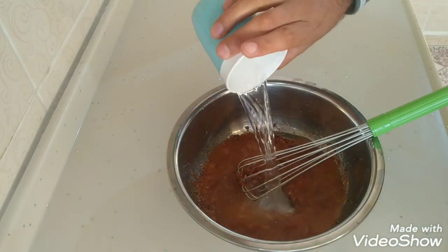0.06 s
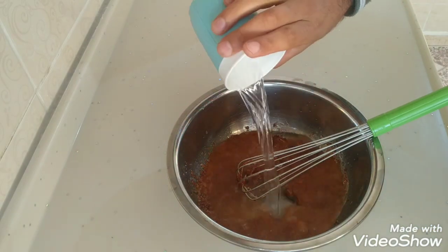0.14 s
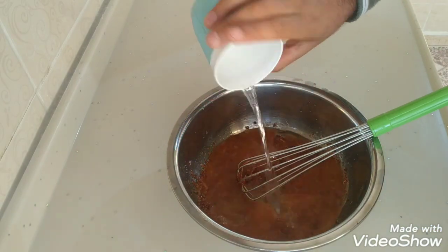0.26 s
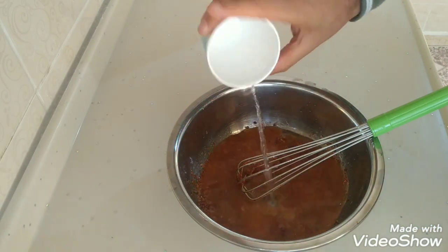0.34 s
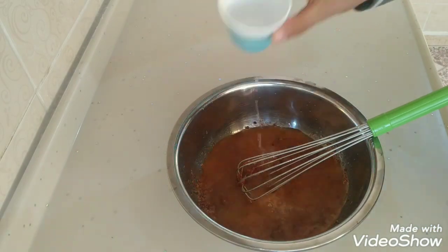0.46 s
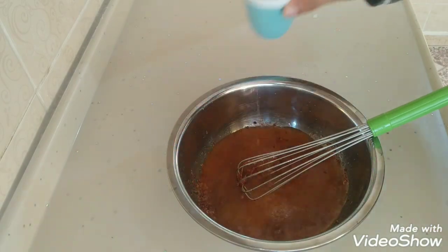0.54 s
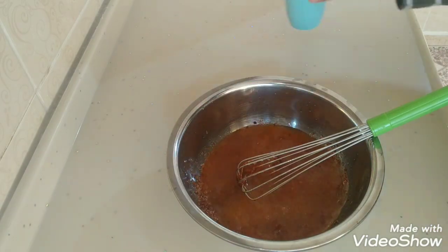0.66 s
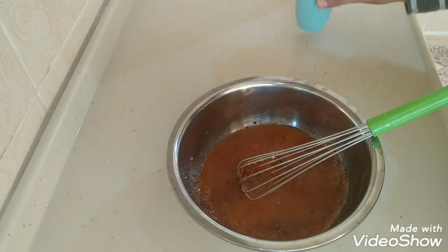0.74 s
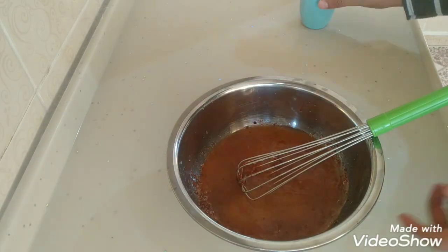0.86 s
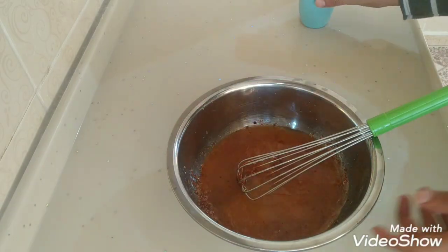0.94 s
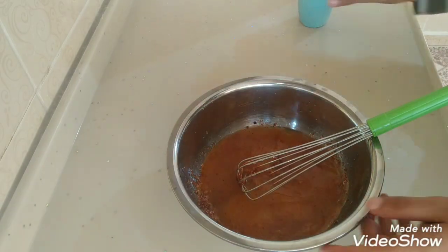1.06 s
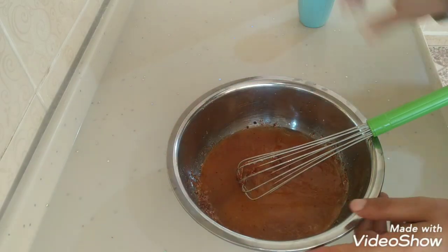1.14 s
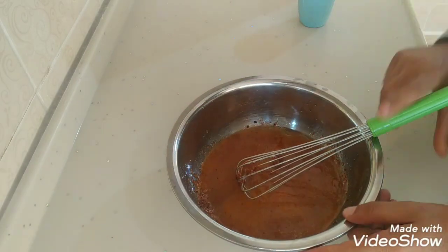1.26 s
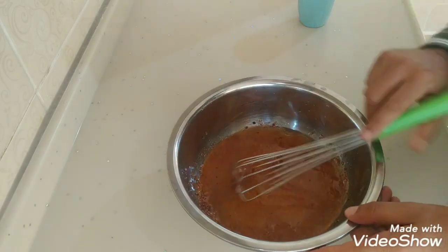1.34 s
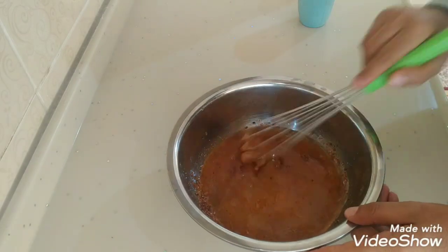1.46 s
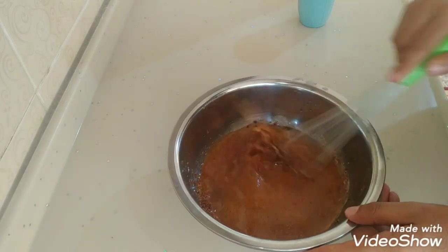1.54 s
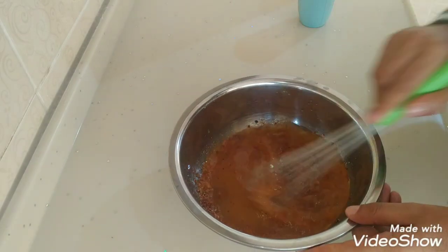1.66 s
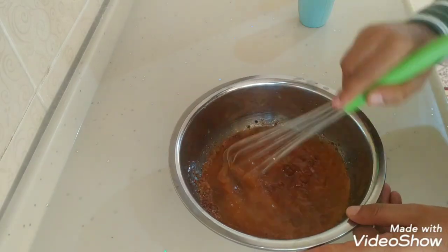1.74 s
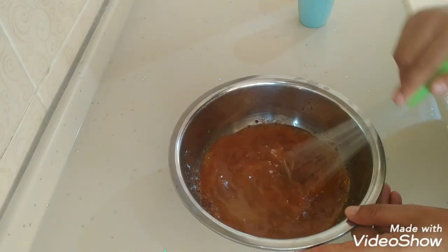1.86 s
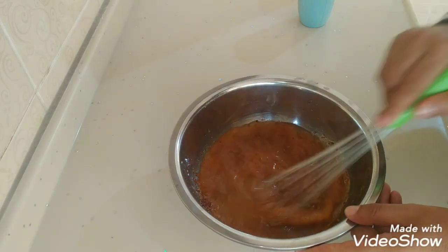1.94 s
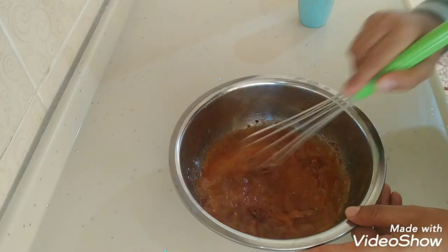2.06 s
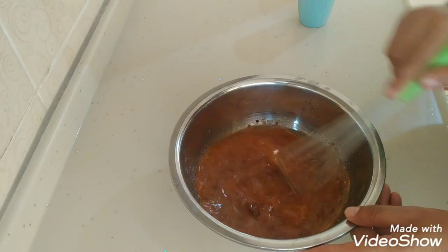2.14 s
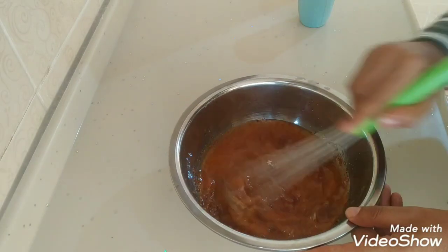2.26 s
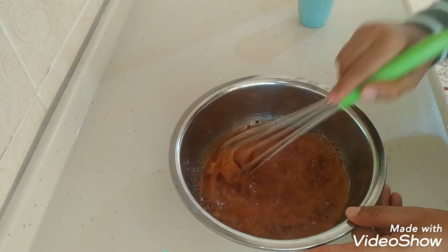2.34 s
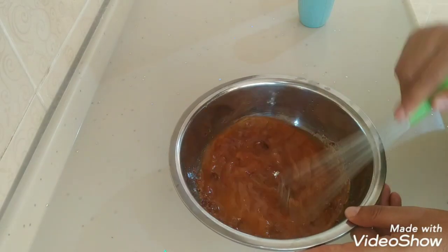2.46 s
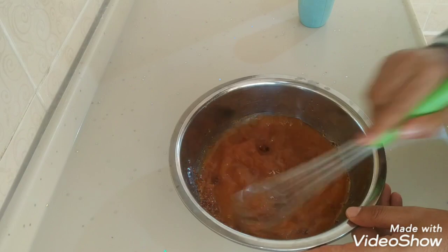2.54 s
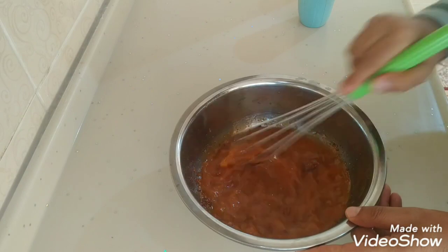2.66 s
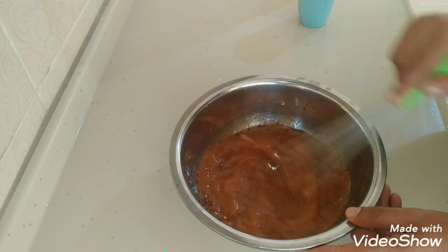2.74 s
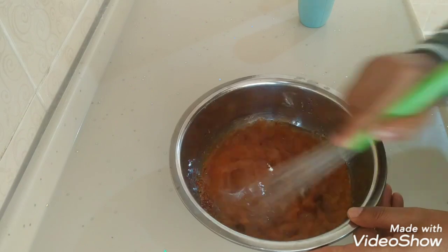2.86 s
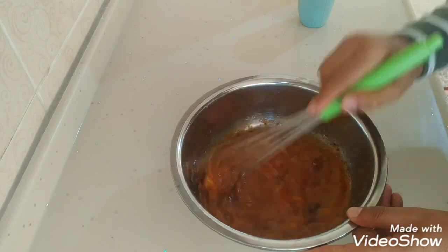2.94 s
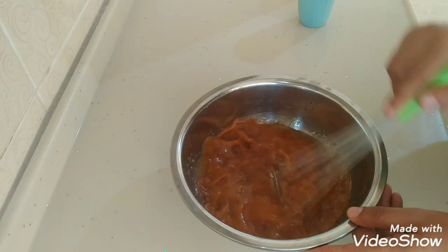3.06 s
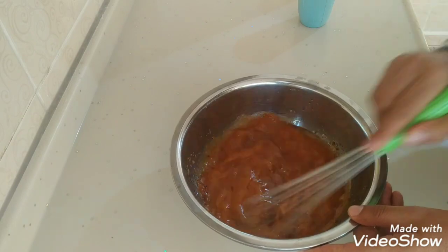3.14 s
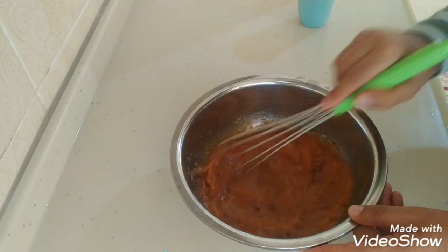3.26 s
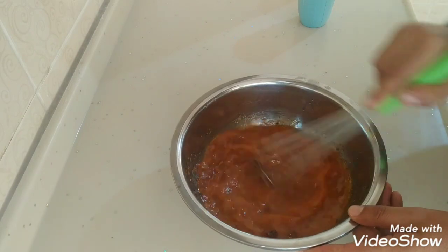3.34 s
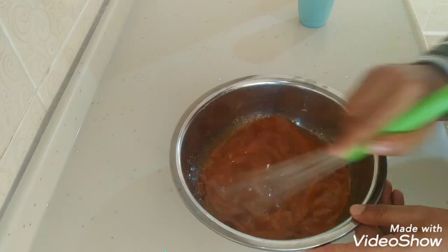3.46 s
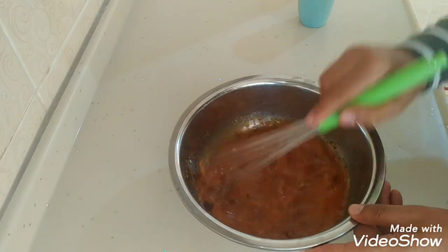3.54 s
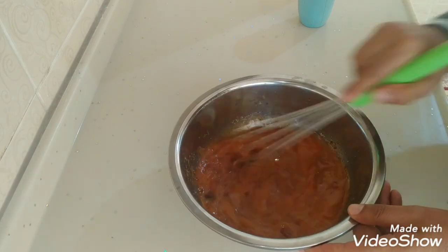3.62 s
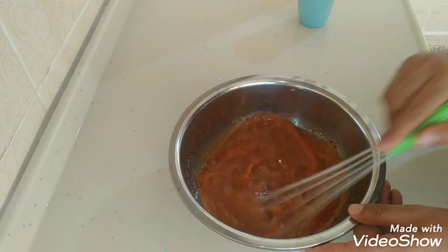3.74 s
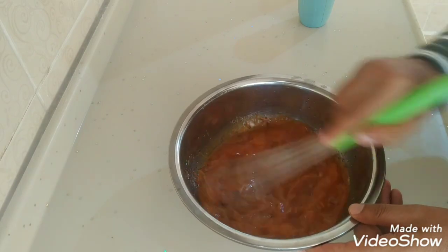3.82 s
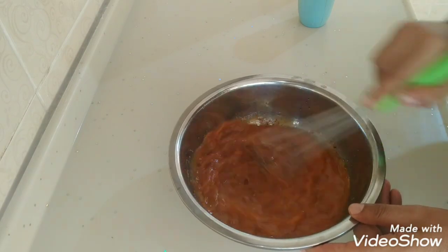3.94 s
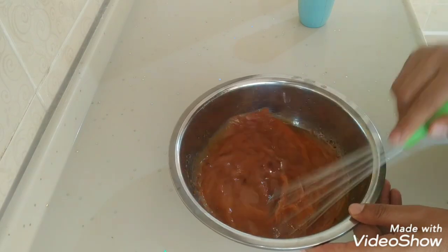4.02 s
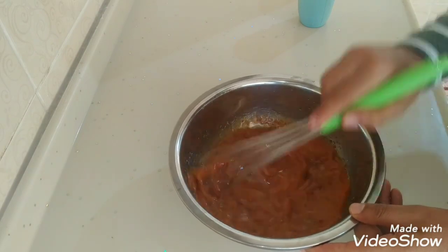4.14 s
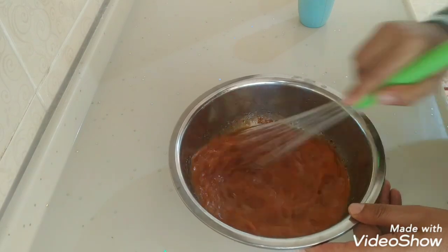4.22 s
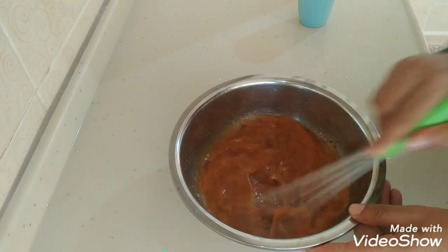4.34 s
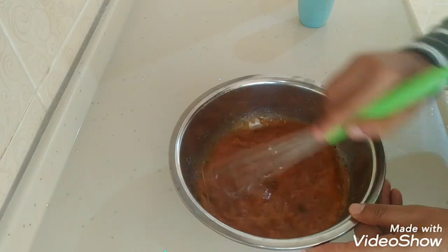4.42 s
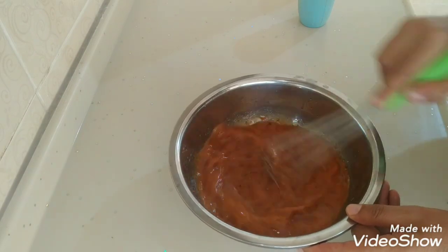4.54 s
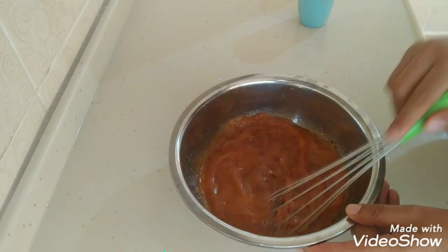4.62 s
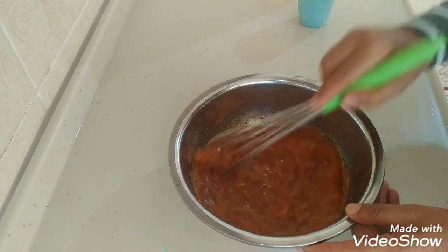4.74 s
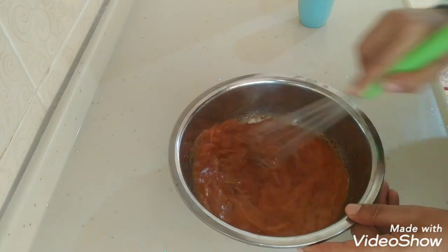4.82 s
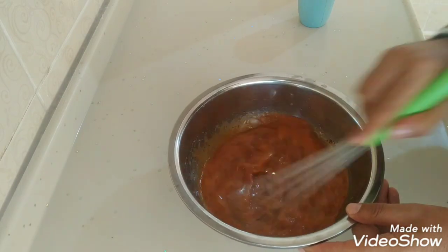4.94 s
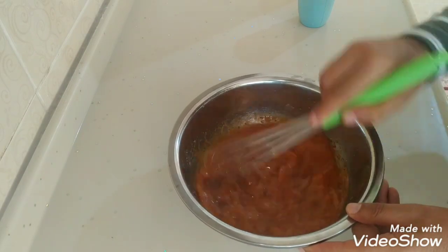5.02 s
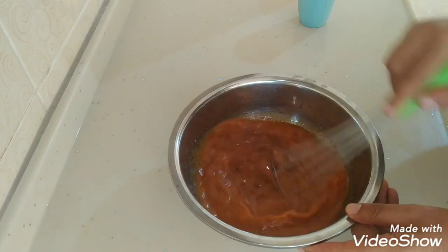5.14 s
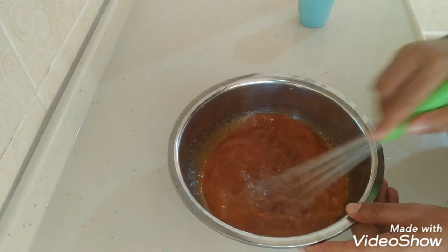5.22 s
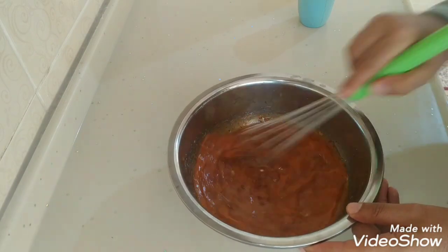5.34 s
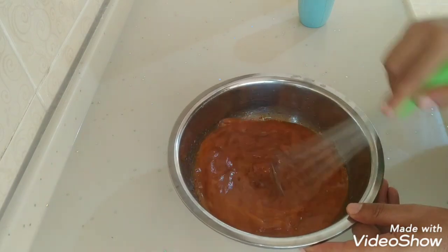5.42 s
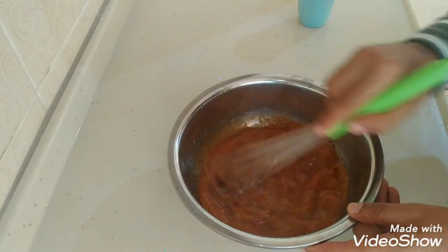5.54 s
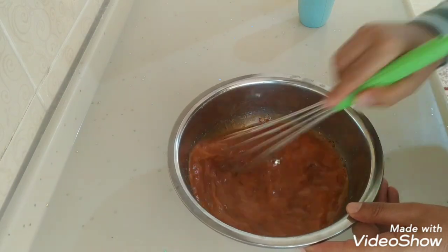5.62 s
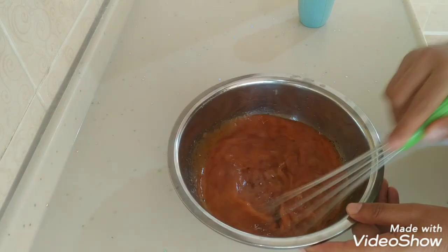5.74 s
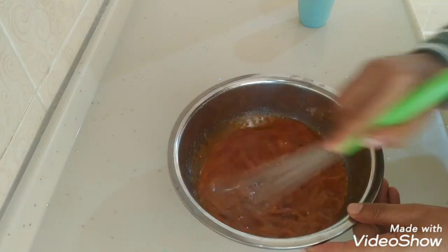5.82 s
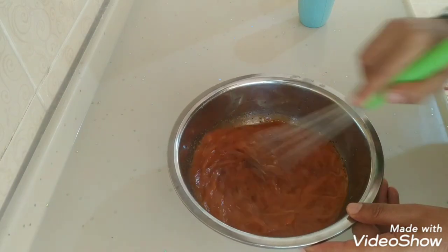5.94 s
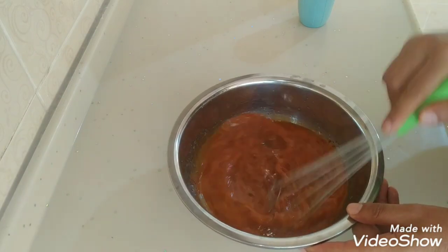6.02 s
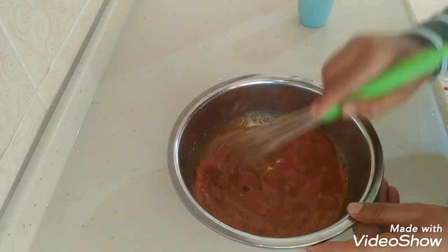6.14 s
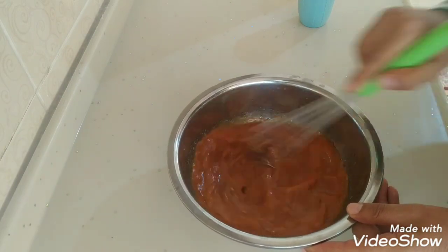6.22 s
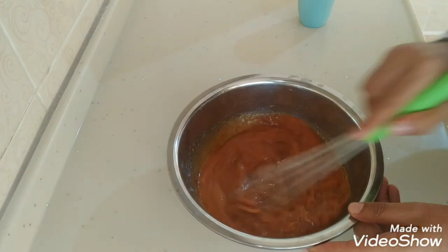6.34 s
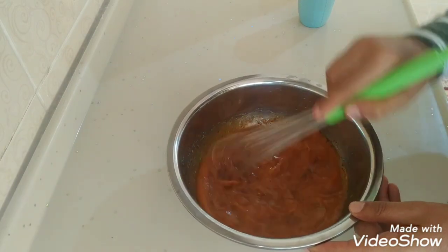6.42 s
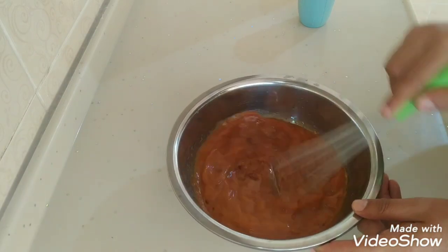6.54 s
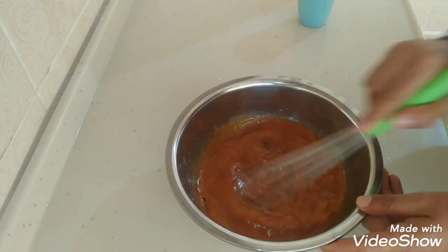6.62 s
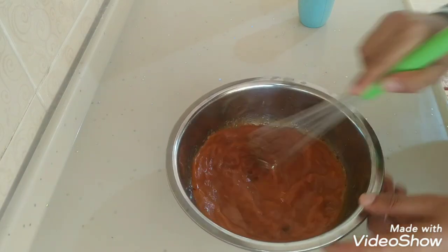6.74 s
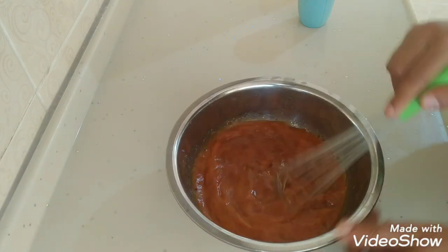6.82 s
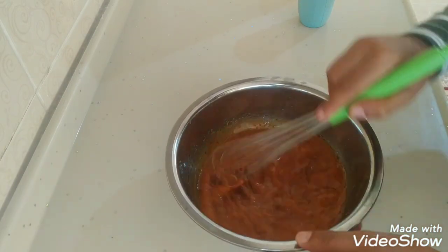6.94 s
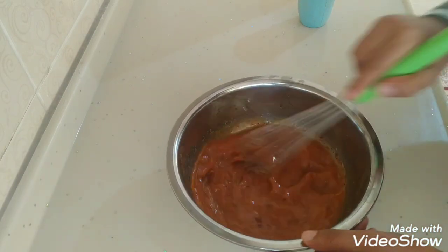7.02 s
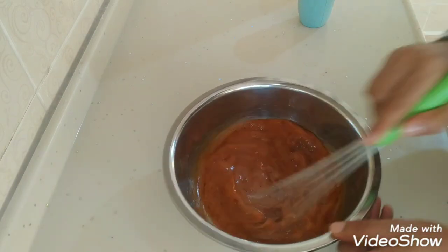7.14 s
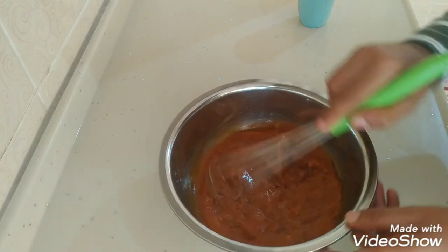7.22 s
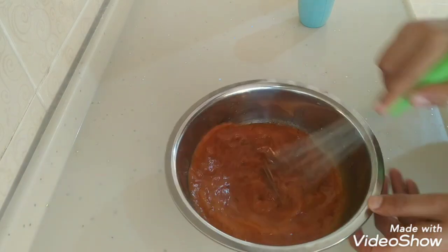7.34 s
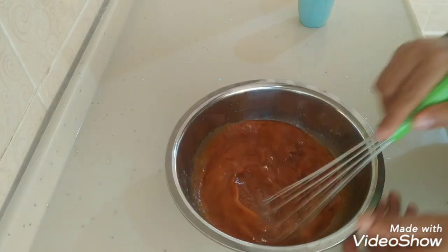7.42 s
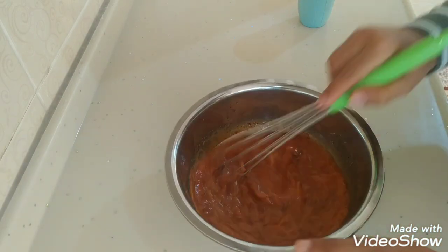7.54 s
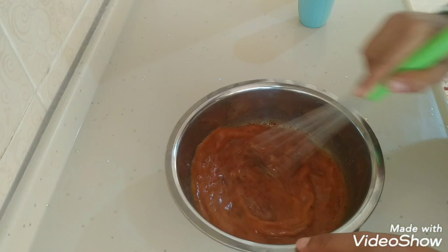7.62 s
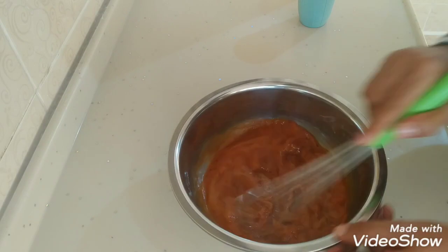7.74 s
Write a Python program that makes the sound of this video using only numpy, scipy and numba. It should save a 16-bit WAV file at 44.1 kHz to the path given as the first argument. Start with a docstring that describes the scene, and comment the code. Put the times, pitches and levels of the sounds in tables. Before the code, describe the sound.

In a small kitchen with a low steady hum, a close stereo microphone picks up a brief, bubbly pour of water and the hollow clack of a cup set down. Then a wire whisk starts beating thick sauce in a steel bowl and keeps going. Its quick wet swishes mix with small gloops, sharp wire ticks and damped metal knocks, over soft low bumps from the counter.

```python
"""A small hard kitchen with a low hum, heard by two close microphone ports.
Water pours from a cup into a steel bowl of sauce: a spray of chirping bubbles that thins to a trickle.
The cup lands on the counter with a hollow clack. Then a wire whisk circles the bowl about three times
a second, swishing and squelching through the sauce and knocking the steel into short rings,
while the rocking bowl makes the counter top rumble."""
import sys
import numpy as np
from numba import njit
from scipy import signal
from scipy.io import wavfile

SR = 44100
rng = np.random.default_rng(int(sys.argv[2]) if len(sys.argv) > 2 else 0)


def wrap_up_sound(samples):
    """Save the sound to the file named by the first command line argument, as 16-bit audio."""
    columns = np.atleast_2d(samples).T
    # keep every value between -1 and 1, then stretch to whole-number steps
    tamed = np.clip(columns, -1, 1)
    steps = np.round(tamed * 32767).astype(np.int16)
    wavfile.write(sys.argv[1], SR, steps)


N = 343098

# Table levels are relative: each layer adds its own trim. pan_db is left minus right.
# how alike the two ports sound: pitch_hz, correlation
PORT_LIKENESS = [(30, 0.88), (150, 0.95), (300, 0.57), (600, 0.32), (1500, 0.15), (4000, 0.11),
                 (12000, 0.0095)]
# tone colour of the kitchen hum: pitch_hz, density_db
HUM_SPECTRUM = [(25, -22), (40, -11), (60, 1.5), (100, -3), (200, -22), (400, -11.5), (1000, -24),
                (3000, -35.5), (12000, -46), (16000, -42.5)]
# modes of the counter top: pitch_hz, width_hz, level_db
COUNTER_MODES = [(56.4, 11.5, -6), (64.6, 33, -27), (100.6, 14.6, -0.5), (126.7, 29, -3),
                 (195.6, 20.7, -0.5), (227.9, 17.2, -1.5), (344, 75, 7)]
# cup, hand or rocking bowl bumps the counter: crest_s, length_ms, deep_db, upper_db
COUNTER_BUMPS = [(0.88, 160, -31, -41.5), (1.23, 53, -47, -54), (1.39, 120, -30, -42),
                 (1.579, 30, -16.5, -43), (1.68, 196, -27, -28), (2.0, 53, -34, -39.5),
                 (2.11, 40, -35, -62), (2.23, 82, -39, -36.5), (2.54, 29, -48, -26), (2.82, 76, -49, -29.5),
                 (2.92, 450, -37, -45), (3.14, 140, -36, -35.5), (3.38, 35, -31, -56), (3.46, 63, -51, -35),
                 (3.56, 150, -42, -39), (3.77, 75, -28, -34.5), (4.06, 113, -31, -30.5),
                 (4.359, 43, -31, -30.5), (4.49, 99, -39, -43), (4.64, 110, -28.5, -34),
                 (4.941, 64, -49, -32), (5.22, 87, -51, -35.5), (5.27, 750, -56, -43.5),
                 (5.5, 130, -51, -44), (5.65, 41, -45, -45), (5.79, 120, -28, -35), (5.98, 37, -34, -48),
                 (6.08, 64, -50, -30), (6.32, 94, -43, -37), (6.389, 40, -49, -30.5), (6.43, 130, -35, -47),
                 (6.61, 39, -51, -36.5), (6.74, 230, -33, -47), (7.0, 180, -24, -36.5),
                 (7.15, 72, -37, -34), (7.38, 35, -48, -48), (7.47, 40, -23.5, -43),
                 (7.69, 320, -25, -37.5)]
# the counter trembles between bumps: time_s, deep_db, upper_db
COUNTER_TREMBLE = [(0.0, -44, -52), (0.41, -58, -54.5), (0.6, -43.5, -55), (1.1, -40.5, -56),
                   (1.8, -43, -66), (2.6, -47.5, -49.5), (3.9, -40.5, -65), (5.1, -54, -74),
                   (5.5, -40, -64), (6.2, -45.5, -62), (7.1, -37.5, -48), (7.78, -52, -60)]
# the cup meets the counter: start_s, level_db
CUP_LANDING = [(0.872, -11.5)]
# modes of the hollow cup: pitch_hz, level_db, t60_s
CUP_MODES = [(108, -16.5, 0.2), (273, -20.5, 0.16), (486, -23, .4), (536, -19, 0.27), (623, -12, 0.24),
             (755, -14, 0.53), (802, 0, 0.2), (836, -8, 0.53), (870, -3.5, 0.2), (926, -19, 0.36),
             (948, -12, .15), (1120, -9, 0.12), (1270, -16, 0.13), (1550, -9, 0.076), (2015, -10, 0.034),
             (2180, -8, 0.052), (2660, -15, 0.044), (4120, -9, 0.027), (4360, -7.5, 0.018),
             (4730, -13, 0.032)]
# dense small modes of cup and counter: pitch_hz, density_db
CLACK_SPECTRUM = [(120, -52), (200, -46), (409, -32), (836, -17.5), (1370, -24), (2210, -22), (3070, -32),
                  (3500, -50), (4500, -27), (5600, -33), (11700, -35.5), (12600, -35), (16000, -102)]
# the pour thins to a trickle: time_s, level_db
POUR_LEVEL = [(0.0, -41.5), (0.3, -36.5), (0.39, -39), (0.41, -45), (0.45, -39), (0.55, -51), (0.62, -62),
              (0.675, -64), (0.72, -67), (0.8, -82)]
# tone colour of the splash: pitch_hz, density_db
SPLASH_SPECTRUM = [(290, -51), (500, -17), (761, -12), (843, -11), (1060, -12.5), (2730, 0.5), (3110, -0.5),
                   (10500, -1.5), (16000, -7)]
# single drops: start_s, spit_db, plink_hz, plink_db
WATER_DROPS = [(0.0245, -44, 2630, -29), (0.068, -36, 3730, -33), (0.079, -32, 2480, -26),
               (0.087, -30, 2010, -29), (0.136, -36, 2570, -23.5), (0.155, -25, 2870, -28),
               (0.215, -37, 2400, -29), (0.245, -41, 4260, -27), (0.288, -33, 1410, -33),
               (0.314, -38, 3920, -27), (0.348, -26, 1810, -26), (0.3852, -16, 3420, -26.5),
               (0.435, -14, 1500, -35), (0.492, -21, 2920, -38), (0.5558, -27.5, 4700, -34),
               (0.569, -33, 2000, -37), (0.7557, -59, 10200, -31.5), (1.0789, -37, 6940, -43)]
# air pockets burst in the thick sauce: start_s, pitch_hz, level_db
AIR_POCKETS = [(1.678, 645, -24), (3.51, 724, -23), (3.553, 649, -22.5), (3.765, 685, -28.5),
               (3.885, 436, -35), (3.998, 1040, -44), (4.105, 1050, -29), (4.185, 840, -33),
               (4.345, 1040, -34), (5.3, 594, -24), (5.34, 807, -28), (5.6, 618, -27.5), (5.86, 370, -26),
               (6.428, 570, -41), (6.565, 900, -34.5), (6.962, 410, -29.5), (7.085, 510, -36),
               (7.675, 840, -39)]
# tone colour of the scraping whisk: pitch_hz, density_db
SCRAPE_SPECTRUM = [(180, -21.5), (300, -74), (373, -6), (566, -14), (830, -9.5), (965, -21.5), (1070, 2.5),
                   (1390, -11), (2300, -3), (5290, -10), (6920, -12), (14200, -16.5), (16200, -52)]
# hand on the rim, then wires dragging between swipes: time_s, scrape_db, low_boost_db, wire_boost_db
WHISK_DRAG = [(1.12, -67, 0, 8), (1.32, -71, 5, 14.5), (1.47, -42, -16, -15), (1.75, -33, -4, -4),
              (1.9, -47.5, -4, -1.5), (2.4, -43, -4.5, 1), (2.95, -36, -10.5, -3.5), (3.6, -44, -1.5, 1),
              (4.2, -40, -7, 1), (5.1, -45.5, -0.5, -5), (5.9, -43, -7, -1), (6.7, -44.5, -8, 6),
              (7.78, -40, -2.5, 0.5)]
# swipes past the wall: crest_s, swell_ms (per 10 dB), fade_ms (per 10 dB), scrape_db, low_boost_db,
# wire_boost_db
WHISK_SWIPES = [(1.418, 17, 1, -44, -3, -16), (1.5, 22, 28, -38.5, 6, 6), (1.562, 4, 75, -38.5, 0, 12.5),
                (1.67, 12, 30, -24, -8.5, -3.5), (2.055, 128, 143, -37, -13, -0.5),
                (2.136, 88, 51, -38, -13, -25), (2.227, 18, 31, -47.5, 7.5, 9.5),
                (2.325, 18, 75, -30.5, -37, -7.5), (2.539, 52, 51, -39.5, -3, 1.5),
                (2.842, 46, 92, -30.5, -1, 3), (3.139, 13, 27, -28.5, -4.5, -5),
                (3.273, 27, 122, -45.5, -18, 5), (3.442, 34, 20, -28, -11, -2),
                (3.546, 37, 48, -34, 5.5, 10.5), (3.705, 35, 91, -32, -23, -6),
                (3.748, 14, 72, -37.5, 0.5, -1), (3.882, 88, 97, -37.5, -8, -2),
                (4.046, 43, 75, -26, -12, -3.5), (4.288, 12, 73, -29, -28, 0.5),
                (4.338, 18, 44, -32, -5.5, -3.5), (4.401, 11, 68, -33.5, -21, 3.5),
                (4.607, 42, 44, -32.5, -24, 3), (4.728, 71, 133, -37, -7, 1.5),
                (4.892, 34, 93, -31, -20, -2), (5.031, 30, 53, -29, -13, 1), (5.192, 45, 74, -33, -31, 2),
                (5.303, 28, 62, -25.5, -4, -4), (5.463, 77, 130, -33.5, -26, -1),
                (5.585, 47, 181, -34.5, -5.5, -1.5), (5.786, 36, 77, -23.5, 1.5, 2.5),
                (6.011, 23, 67, -28.5, -32, -0.5), (6.056, 43, 63, -40, 2, 10.5),
                (6.167, 54, 77, -34, -4, -1), (6.308, 29, 46, -29.5, -30, -2), (6.423, 17, 55, -29, 0, -1),
                (6.565, 27, 59, -35.5, -10, 2.5), (6.702, 37, 37, -27.5, -9, -1.5),
                (6.829, 46, 43, -35.5, -9.5, 1.5), (6.964, 16, 84, -29, -5, -2.5),
                (7.131, 54, 66, -34.5, -3.5, -0.5), (7.247, 47, 100, -30.5, -7.5, -2.5),
                (7.428, 63, 29, -36, -9, 4), (7.545, 33, 36, -29.5, -31, 1), (7.72, 36, 64, -34, -17, 1.5)]
# the top treble dulls as the stirring goes on: time_s, level_db
SIZZLE_LEVEL = [(1.4, 4), (3.0, 1), (4.5, -10), (5.5, -14), (7.78, -14)]
# the low mids dip briefly: middle_s, length_ms, lower_depth_db, upper_depth_db (negative: no dip)
MID_DIPS = [(2.18, 38, 14, -4), (3.73, 31, 15, 5), (4.14, 40, 4, -11), (4.315, 22, 20, 1),
            (3.89, 30, 4, -9), (4.73, 63, 7, -11), (4.865, 65, 13, -3), (5.065, 24, 20, -2),
            (5.12, 83, 13, -3), (5.195, 13, 9, 26), (5.325, 48, 24, -2.5), (5.58, 82, 32, 3.5),
            (6.025, 36, 31, 14), (6.17, 74, 28, 0), (6.24, 77, 11, -2), (6.337, 19, 21, 5),
            (6.383, 14, -5, 8), (6.59, 76, 29, 4), (6.926, 36, 14, 16), (7.101, 48, 14, 10),
            (7.235, 43, 14, 19), (7.51, 44, 16, 7), (7.555, 40, 14, 1)]
# the lower and the upper band that dip: low_hz, high_hz
DIP_BANDS = [
    [210, 660],
    [680, 2050],
]
# a wire snaps on the wall or an air pocket slaps shut: start_s, pitch_hz, level_db, base_t60_s, pan_db
SNAP_RINGS = [(1.502, 1060, -30, 0.033, -7), (1.556, 6700, -22, 0.038, -2), (1.557, 3660, -29.5, 0.03, -2),
              (1.557, 7480, -13.5, 0.038, -8), (1.59, 7320, -23, 0.038, 5), (1.631, 5950, -29, 0.12, -8),
              (1.67, 296, -22, 0.026, -9), (2.321, 3190, -20, 0.04, -6), (2.343, 2560, -24, 0.03, 1),
              (2.535, 2390, -31, 0.04, -2), (2.84, 5780, -24, 0.03, -9), (2.845, 2285, -22.5, 0.019, -12),
              (2.907, 6650, -33, 0.03, -2), (3.439, 1664, -25, 0.027, -4), (3.44, 2400, -25, 0.043, 0),
              (3.508, 1076, -24, 0.05, 10), (3.508, 6800, -26, 0.03, -9), (3.549, 7470, -20, 0.023, -1),
              (3.55, 6840, -11, 0.015, -13), (4.044, 8060, -27.5, 0.043, -11),
              (4.045, 2580, -19, 0.025, -1), (4.283, 6450, -26, 0.028, -9), (4.287, 1080, -25, 0.053, 3),
              (4.333, 3450, -23, 0.03, -4), (5.021, 6770, -36, 0.075, -16), (5.055, 2240, -27, 0.039, -2),
              (5.301, 1893, -30, 0.079, 3), (5.301, 2670, -22.5, 0.041, -1), (5.469, 2310, -33, 0.038, -4),
              (5.75, 3140, -32, 0.068, -5), (5.781, 1100, -15, 0.094, 4), (5.788, 1030, -21, 0.042, 3),
              (6.007, 2630, -23.5, 0.025, -7), (6.008, 6860, -29, 0.11, 5), (6.05, 3140, -25, 0.026, -9),
              (6.051, 690, -26, 0.036, -11), (6.161, 824, -31, 0.1, -2), (6.184, 2230, -28, 0.073, 2),
              (6.321, 2220, -28.5, 0.035, -4), (6.416, 6420, -25, 0.046, -1), (6.431, 2230, -24, 0.061, 6),
              (6.682, 7250, -34, 0.14, -9), (6.698, 1920, -23.5, 0.047, -3),
              (6.717, 874, -23.5, 0.057, 4.5), (6.962, 5550, -33, 0.075, -10),
              (6.965, 4270, -28, 0.064, -4), (7.141, 6800, -37, 0.045, -9), (7.254, 1500, -29, 0.027, -8),
              (7.375, 1700, -31, 0.025, 10), (7.416, 7340, -26.5, 0.038, -9), (7.424, 6910, -35, 0.03, -9),
              (7.545, 3350, -39, 0.038, -10), (7.545, 8400, -27, 0.03, -9), (7.714, 7500, -27, 0.033, -10),
              (7.742, 6870, -24, 0.023, -12)]
# a bare wire hits steel: start_s, level_db
WIRE_TICKS = [(1.5, -31), (1.556, -18.5), (1.669, -23), (2.321, -35), (3.507, -35), (3.549, -27),
              (4.282, -33), (5.302, -25), (5.75, -20.5), (5.781, -22), (6.961, -24), (7.373, -29)]
# modes of the wires and of the bowl, damped by sauce and hand: pitch_hz, level_db, base_t60_s
BOWL_MODES = [(387, -1, 0.15), (618.5, 2, 0.17), (700, 0.5, 0.054), (849.5, 1.5, 0.17), (1050, 4, 0.072),
              (1300, -9, 0.083), (1487, -2.5, 0.16), (1890, 10, 0.019), (2245, 5.5, 0.13),
              (2260, -1, 0.048), (2465, 13, 0.028), (2730, 4, 0.046), (3226, 6, 0.09), (3660, 6, 0.016),
              (4470, -2.5, 0.24), (6500, 2.5, 0.21), (7000, 0.5, 0.21), (7000, -2, 0.32), (7120, -3, 0.19),
              (7700, 6.5, 0.036), (7780, -1.5, 0.069)]
# those modes reach the ports unevenly: pitch_hz, pan_db
BOWL_PAN = [(400, -3.5), (1060, 8), (2300, 2), (3300, 3.5), (5500, 2), (7000, 2), (9000, -11)]
# the whisk knocks the wall: start_s, level_db, focus_hz, thud_db, pan_db
WHISK_KNOCKS = [(1.499, -41, 1050, -43, 3), (1.556, -20.5, 7300, -35, 10), (1.67, -14.5, 530, -23.5, -3),
                (2.22, -31, 2280, -44, -4), (2.321, -50, 3040, -43.5, 0), (2.534, -35, 2400, -42.5, 3),
                (2.817, -19, 7560, -34.5, -3), (2.908, -30, 6940, -47, -8), (3.134, -43, 2900, -38, -7),
                (3.44, -29, 2250, -32.5, 3), (3.507, -18, 1180, -37, -8), (3.549, -16, 8300, -31.5, -1),
                (3.702, -26.5, 1080, -42, -3), (3.744, -28.5, 3060, -31, -3), (3.993, -30, 1080, -52, -8),
                (4.042, -22.5, 2470, -34, -3), (4.282, -30, 1090, -43, -8), (4.335, -26, 6740, -32.5, -3),
                (4.394, -30.5, 3060, -56, -13), (4.586, -30, 1060, -43, -6), (4.634, -28, 400, -52, -2),
                (4.885, -29, 1080, -40, -6), (4.929, -31, 1880, -41, 0), (5.007, -34, 7340, -53, -14),
                (5.191, -36, 4830, -41, 9), (5.3, -33, 2600, -68, -2), (5.752, -21, 3100, -35, -2),
                (5.78, -11, 890, -36, -8), (5.988, -30, 1030, -48, 4), (6.006, -33, 2780, -60, -10),
                (6.053, -32, 3500, -33, -1), (6.157, -36, 850, -46, 4), (6.419, -27, 2360, -53, -6),
                (6.562, -32, 6600, -38, -2), (6.698, -31, 1510, -34.5, -11), (6.961, -28.5, 1050, -31, -12),
                (7.126, -32.5, 6700, -37, -4), (7.369, -29, 2290, -36, -5), (7.425, -26.5, 6900, -41, -7),
                (7.546, -31, 3300, -67, -18), (7.672, -28.5, 7250, -35, -6), (7.714, -40, 7600, -54, -3)]

STEP = 40   # samples per envelope step
BALANCE_DB, STOPBAND_HZ = -2, 16686   # pan of the whole mix; edge of the treble cut
HUM_DB, HUM_FLICKER_DB, MAINS_HZ, MAINS_DB = -34, 2.5, 101.3, -57
BUMP_SWELL_DB, BUMP_FADE_DB = 38, 15.5   # drop one length before and after the crest


def from_db(db):
    """Decibels to gain."""
    return 10 ** (np.asarray(db) / 20)


def at_hz(points, hz):
    """Read a curve on a log-frequency axis."""
    return np.interp(np.log(hz), np.log(np.array(points)[:, 0]), np.array(points)[:, 1])


def at_time(rows, s):
    """Read each column of an envelope table at the times s."""
    times, *columns = np.transpose(rows)
    return [np.interp(s, times, column) for column in columns]


def uneven(spread_db, count):
    """Random accents in dB: many small, few large."""
    return spread_db * np.minimum(rng.exponential(1, count), 4)


def crests(s, crest_s, swell_db_per_s, fade_db_per_s):
    """Envelope of each event in dB: a straight swell to its crest, then a straight fade."""
    late_s = s[..., None] - crest_s
    return np.where(late_s < 0, swell_db_per_s * late_s, -fade_db_per_s * late_s)


def power_sum(steady_db, events_db):
    """Level in dB of a steady bed with all events on top."""
    return 10 * np.log10(from_db(steady_db) ** 2 + np.sum(from_db(events_db) ** 2, axis=-1))


def drift(rate_hz):
    """A smooth random wobble of rms 1, one value per envelope step."""
    pole = np.exp(-2 * np.pi * rate_hz * STEP / SR)
    white = rng.standard_normal(N // STEP + 2001)
    wobble = signal.lfilter([1], [1, -2 * pole, pole * pole], white)[2000:]
    return wobble / np.sqrt(np.mean(wobble ** 2))


def noise_bands(db_at, flicker_db, rate_hz, low_hz, gulp_db=0.0):
    """Stereo noise in third octaves that each flicker on their own, deeper by gulp_db below 2 kHz."""
    edges = low_hz * 2 ** np.arange(0, np.log2(19000 / low_hz), 1 / 3)
    out, white = 0, rng.standard_normal((2, 2, N))
    for k, (low, high) in enumerate(zip(edges, edges[1:])):
        hz = np.sqrt(low * high)
        bandpass = signal.butter(2, [low, high], "band", fs=SR, output="sos")
        mid, side = signal.sosfilt(bandpass, white[k % 2])
        alike = at_hz(PORT_LIKENESS, hz)
        level_db = db_at(hz) + (flicker_db + gulp_db * (hz < 2000)) * drift(rate_hz)
        gain = np.repeat(from_db(level_db), STEP)[:N]
        out = out + gain * (np.sqrt(1 + alike) * mid + np.sqrt(1 - alike) * side * [[1], [-1]])
    return out


@njit(fastmath=True)
def render_tones(size, starts, pole, bend, rise, weights):
    """Each tone is a spinning, shrinking phasor; bend shifts its pitch and rise softens its attack."""
    out = np.zeros((2, size))
    for k in range(len(starts)):
        z, spin, hidden = 1 + 0j, pole[k], 1.0
        for i in range(starts[k], min(size, starts[k] + int(-5 / np.log(abs(spin))))):
            z *= spin
            spin *= bend[k]
            hidden *= rise[k]
            out[0, i] += (1 - hidden) * (z * weights[k, 0]).imag
            out[1, i] += (1 - hidden) * (z * weights[k, 1]).imag
    return out


def tones(s, hz, db, t60, rise_ms, glide=0.0, pan_db=0.0):
    """Dying stereo tones, wider in the treble; glide is the share of pitch gained per second."""
    s, hz, db, t60, glide, pan_db = map(np.ravel, np.broadcast_arrays(s, hz, db, t60, glide, pan_db))
    hz = np.clip(hz, 20, SR * .4)
    pole = from_db(-60 / (t60 * SR)) * np.exp(2j * np.pi * hz / SR)
    bend = np.exp(2j * np.pi * hz * glide / SR ** 2)
    rise = np.full(len(s), np.exp(-1000 / (rise_ms * SR)))
    alike = np.clip(at_hz(PORT_LIKENESS, hz), .01, .99)
    port_gap = np.sqrt(-2 * np.log(alike)) * rng.standard_normal(len(s))
    phase = rng.uniform(0, 2 * np.pi, len(s)) + np.outer([.5, -.5], port_gap)
    weights = from_db(db + np.outer([.5, -.5], pan_db)) * np.exp(1j * phase)
    return render_tones(N, np.round(s * SR).astype(np.int64), pole, bend, rise, weights.T.copy())


def kitchen_hum():
    """Room tone: a bed of low, wavering noise with one steady mains line."""
    bed = noise_bands(lambda hz: HUM_DB + at_hz(HUM_SPECTRUM, hz), HUM_FLICKER_DB,
                      rate_hz=4.2, low_hz=27.33)
    return bed + from_db(MAINS_DB) * np.sin(2 * np.pi * MAINS_HZ * np.arange(N) / SR)


def kitchen_reverb(send, t60_s, wall_hz):
    """Hard walls answer with a dense tail, its own at each port, that loses its treble first."""
    t = np.arange(SR // 2) / SR
    bright, dull = rng.standard_normal((2, 2, len(t)))
    dull = signal.sosfilt(signal.butter(2, wall_hz, fs=SR, output="sos"), dull)
    tail = (dull * from_db(-60 * t / t60_s) + 3.05 * bright * from_db(-150 * t)) * (t > .004)
    tail /= np.sqrt(np.sum(tail ** 2, axis=1, keepdims=True))
    return signal.fftconvolve(send, tail, axes=1)[:, :N]


def counter_rumble():
    """The low end: the counter top rumbles under the rocking bowl and thuds with each knock."""
    hz, width_hz, db = np.transpose(COUNTER_MODES)
    t60 = np.log(1000) / (np.pi * width_hz)
    s = rng.uniform(0, N / SR, (300, len(hz)))
    crest_s, length_ms, deep_bump_db, upper_bump_db = np.transpose(COUNTER_BUMPS)
    shape_db = crests(s, crest_s, 1000 * BUMP_SWELL_DB / length_ms, 1000 * BUMP_FADE_DB / length_ms)
    deep_bed_db, upper_bed_db = at_time(COUNTER_TREMBLE, s)
    deep_db = power_sum(deep_bed_db, shape_db + deep_bump_db) - 4
    upper_db = power_sum(upper_bed_db, shape_db + upper_bump_db) - 0.5
    rumble = tones(s, hz, np.where(hz > 155, upper_db, deep_db) + db, t60, rise_ms=3.4)
    knock_s, thud_db = np.array(WHISK_KNOCKS).T[[0, 3], :, None]
    return rumble + tones(knock_s, hz, thud_db + db, t60, rise_ms=3.4)


def cup_clack():
    """The base lands edge first: three quick touches ring the hollow cup over a clack of short modes."""
    (s, level_db), = CUP_LANDING
    late_s, touch_db = np.array([(0, -18), (.0015, -1), (.019, -16)]).T[:, :, None]
    hz, db, t60 = np.transpose(CUP_MODES)
    body = tones(s + late_s, hz, level_db + touch_db + db, t60, rise_ms=0.038, pan_db=-0.5)
    hz = np.geomspace(200, 15000, 400)
    db = level_db + at_hz(CLACK_SPECTRUM, hz) + 10 * np.log10(hz / 1000) - 11
    t60 = .5 * (hz / 1000) ** -.8
    return body + tones(s + rng.exponential(0.0022, 400), hz, db, t60, rise_ms=0.073, pan_db=2)


def pour_bubbles():
    """Small bubbles fizz and larger ones gurgle, all rising in pitch as they burst."""
    s, hz = rng.uniform(0, .7, 1500), 900 * 12 ** rng.random(1500)
    db = at_time(POUR_LEVEL, s)[0] + at_hz(SPLASH_SPECTRUM, hz) + uneven(1.8, 1500) - 11
    fizz = tones(s, hz, db, t60=78 / hz + 0.0054, rise_ms=0.36, glide=4.6)
    s, hz = rng.uniform(0, .55, 160), 1500 * 3.5 ** rng.random(160)
    db = at_time(POUR_LEVEL, s)[0] + uneven(1.5, 160) - 3
    return fizz + tones(s, hz, db, t60=0.015, rise_ms=3.5, glide=9)


def water_drops():
    """Each drop spits a burst of tiny bubbles and plinks with a ragged clump around one pitch."""
    s, spit_db, hz, plink_db = np.array(WATER_DROPS).T[:, :, None]
    spit_hz = 1116 * 12.8 ** rng.random((len(s), 60))
    spit_s = s + rng.exponential(0.0018, spit_hz.shape)
    spit = tones(spit_s, spit_hz, spit_db - 23.5, t60=0.008, rise_ms=0.095)
    plink_hz = hz * rng.normal(1, .07, (len(s), 4))
    plink_s = s + rng.exponential(.003, plink_hz.shape)
    return spit + tones(plink_s, plink_hz, plink_db - 4, t60=0.019, rise_ms=0.83, glide=3.9)


def gloops():
    """An air pocket bursts in the sauce: one soft-edged tone that climbs as it dies."""
    s, hz, db = np.transpose(AIR_POCKETS)
    return tones(s, hz, db, t60=0.07, rise_ms=2.3, glide=3.9)


def stroke_at(s):
    """The whisk gesture, swipes on top of the drag: scrape level, low boost, wire boost and sizzle."""
    drag_db, drag_low_db, drag_wire_db = at_time(WHISK_DRAG, s)
    crest_s, swell_ms, fade_ms, crest_db, swipe_low_db, swipe_wire_db = np.transpose(WHISK_SWIPES)
    swipe_db = crest_db + crests(s, crest_s, 1e4 / swell_ms, 1e4 / fade_ms)
    scrape_db = power_sum(drag_db, swipe_db)
    low_db = power_sum(drag_db + drag_low_db, swipe_db + swipe_low_db) - scrape_db
    wire_db = power_sum(drag_db + drag_wire_db, swipe_db + swipe_wire_db) - scrape_db
    return scrape_db, low_db, wire_db, at_time(SIZZLE_LEVEL, s)[0]


def stroke_db(stroke, hz):
    """Level of the rubbing at a pitch: the scrape colour shaped by three moving shelves."""
    scrape_db, low_db, wire_db, sizzle_db = stroke
    sizzle_db = sizzle_db + 0.38 * (scrape_db + 33)   # harder strokes are brighter
    low_shelf = np.clip(np.log2(2400 / hz), 0, 1) * (low_db + 5)
    wire_shelf = np.clip(np.log2(hz / 3030) * 0.64, 0, 1) * (wire_db + 6)
    top_shelf = np.clip(np.log2(hz / 9700) * 1.75, 0, 1) * sizzle_db
    return scrape_db + low_shelf + wire_shelf + top_shelf + at_hz(SCRAPE_SPECTRUM, hz)


def duck_mids(mix):
    """Two low-mid bands duck briefly in smooth, flat-bottomed hollows."""
    s = np.arange(N // STEP + 1) * STEP / SR
    middle_s, length_ms, *depths_db = np.transpose(MID_DIPS)
    hollow = np.exp(-(2000 * (s[:, None] - middle_s) / length_ms) ** 4)
    for edges_hz, depth_db in zip(DIP_BANDS, depths_db):
        band = signal.sosfiltfilt(signal.butter(4, edges_hz, "band", fs=SR, output="sos"), mix)
        gain = np.interp(np.arange(N) / SR, s, from_db(-hollow @ np.maximum(depth_db, 0)))
        mix = mix - band * (1 - gain)
    return mix


def wet_swish():
    """Smooth wet noise: first the splash of the pour, then wires dragging through sauce and on steel."""
    s = np.arange(N // STEP + 1) * STEP / SR
    pour_db, stroke = at_time(POUR_LEVEL, s)[0] + 1, stroke_at(s)
    tilt_db_per_octave = 11.2 * np.clip((s - .5) / 0.16, 0, 1)   # the last trickle is brighter

    def db_at(hz):
        splash_db = pour_db + tilt_db_per_octave * np.log2(hz / 4050) + at_hz(SPLASH_SPECTRUM, hz)
        return np.where(s < 1, splash_db, stroke_db(stroke, hz) + 4)

    return noise_bands(db_at, flicker_db=3, rate_hz=16.1, low_hz=287, gulp_db=4)


def sauce_squelch():
    """Short wet rings give the swish its grain; larger air pockets squelch and glide."""
    s, hz = rng.uniform(1.12, N / SR, 7000), 400 * 35 ** rng.random(7000)
    accent_db = uneven(4, 7000) * np.clip(4500 / hz, .45, 1)   # more even in the treble
    db = stroke_db(stroke_at(s), hz) + 4.5 * np.log2(hz / 3000) + accent_db - 6.5
    grain = tones(s, hz, db, t60=.06 * (hz / 1000) ** -.1, rise_ms=2)
    s, hz = rng.uniform(1.4, N / SR, 400), 380 * 6.3 ** rng.random(400)
    db = stroke_db(stroke_at(s), hz) + uneven(3.3, 400) - 2.5
    return grain + tones(s, hz, db, t60=0.045, rise_ms=4, glide=rng.normal(1, 1.5, 400))


def snap_rings():
    """A snapping wire or a closing air pocket pings one pitch: three close, quickly dying partials."""
    s, hz, db, t60, pan_db = np.array(SNAP_RINGS).T[:, :, None]
    lag, detune = rng.standard_normal((len(s), 2, 3)).swapaxes(0, 1)
    return tones(s + 0.0017 * abs(lag), hz * (1 + .012 * detune), db - 6, t60 * 1.66,
                 rise_ms=0.4, pan_db=pan_db - BALANCE_DB)


def wire_ticks():
    """A bare wire on steel gives a sharp, bright tick: a tight burst of very short treble tones."""
    s, db = np.array(WIRE_TICKS).T[:, :, None]
    hz = 3200 * 2.3 ** rng.random((len(s), 40))
    return tones(s + rng.exponential(0.0015, hz.shape), hz, db - 11, t60=0.014, rise_ms=0.045)


def bowl_murmur():
    """The scraping stroke keeps the modes of bowl and wires murmuring."""
    hz, db, t60 = np.transpose(BOWL_MODES)
    is_wire = hz > 5000
    s = rng.uniform(1.4, N / SR, (260, len(hz)))
    slip_db = uneven(2.5, s.shape) * np.where(hz > 4000, .9, 1)
    murmur_db = stroke_db(stroke_at(s), hz) - at_hz(SCRAPE_SPECTRUM, hz) + db + slip_db - 16.5
    # moving sauce shifts the modes, and no two wires are tuned alike
    loaded_hz = hz * rng.normal(1, .012 + .015 * is_wire, s.shape)
    damped_t60 = t60 * np.where(is_wire, .55, .85)   # dragged wires ring short
    return tones(s, loaded_hz, murmur_db, damped_t60, rise_ms=0.2, pan_db=at_hz(BOWL_PAN, hz))


def whisk_knocks():
    """Each knock rings the bowl and a clatter of damped modes, both favouring its focus pitch."""
    hz, db, t60 = np.transpose(BOWL_MODES)
    is_wire = hz > 5000
    s, level_db, focus_hz, _, pan_db = np.array(WHISK_KNOCKS).T[:, :, None]
    pan_db = pan_db - BALANCE_DB
    focus_db = -np.minimum(22 * np.log2(hz / focus_hz) ** 2, 14)
    struck_db = level_db + db + focus_db + 3 * rng.standard_normal(focus_db.shape) - 13.5
    struck_hz = hz * rng.normal(1, .015 + .03 * is_wire, focus_db.shape)
    ring = tones(s, struck_hz, struck_db, t60 * np.where(is_wire, .7, 1.1),
                 rise_ms=0.066, pan_db=pan_db + at_hz(BOWL_PAN, hz))
    hz = 400 * 38 ** rng.random((len(s), 120))
    landing_s = s + 0.014 * rng.random(hz.shape) ** 3   # the wires land one after another
    focus_db = -np.minimum(28 * np.log2(hz / focus_hz) ** 2, 10)
    clatter_db = level_db + focus_db + 2.6 * np.log2(hz / 2000) - 18
    return ring + tones(landing_s, hz, clatter_db, t60=0.071, rise_ms=0.17, pan_db=pan_db)


def scene():
    """Close sources over reverb and hum; the cup gets more reverb, the gloops stay dry and unducked."""
    close = pour_bubbles() + water_drops() + wet_swish() + sauce_squelch()
    close += snap_rings() + wire_ticks() + bowl_murmur() + whisk_knocks() + counter_rumble()
    cup = cup_clack()
    room = kitchen_reverb(from_db(-14.5) * close + from_db(-9) * cup, t60_s=0.75, wall_hz=2580)
    mix = duck_mids(close + cup + room + kitchen_hum()) + gloops()
    return mix * from_db([[BALANCE_DB / 2], [-BALANCE_DB / 2]])


def record(dry):
    """A steep low-pass shaves off the very top."""
    return signal.sosfilt(signal.cheby2(14, 70, STOPBAND_HZ, fs=SR, output="sos"), dry)


dry = scene()
out = record(dry)
wrap_up_sound(out)
```